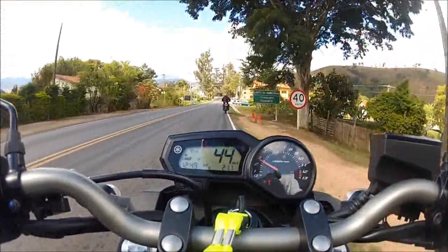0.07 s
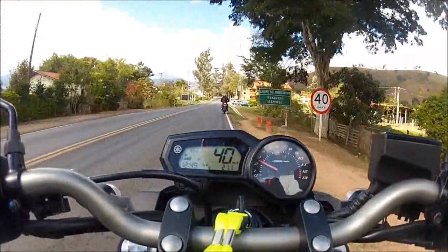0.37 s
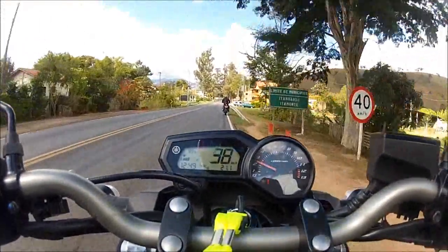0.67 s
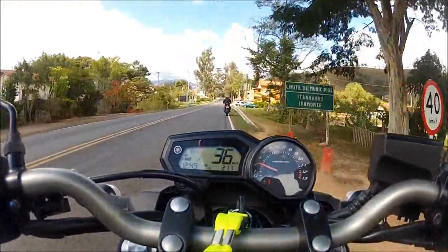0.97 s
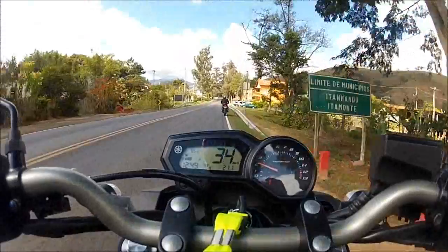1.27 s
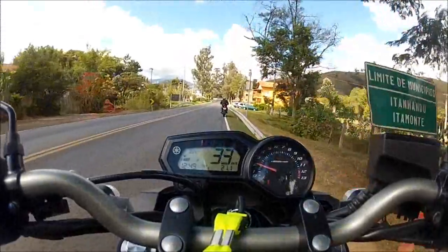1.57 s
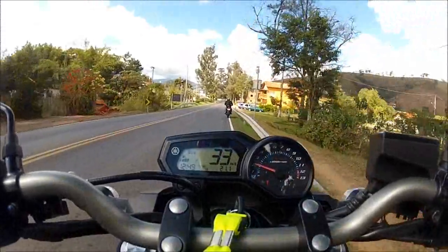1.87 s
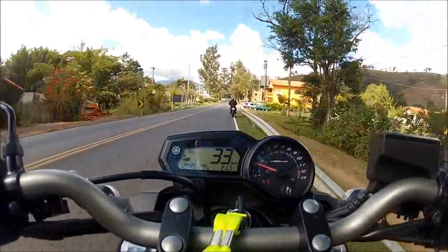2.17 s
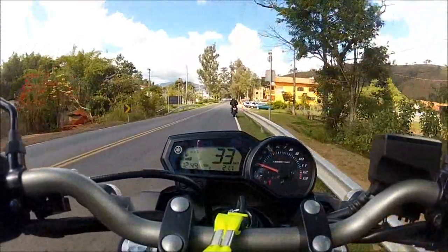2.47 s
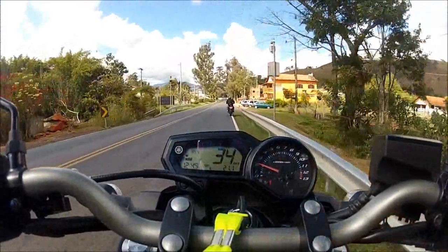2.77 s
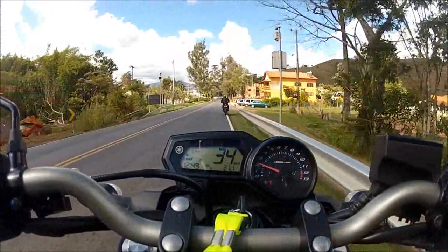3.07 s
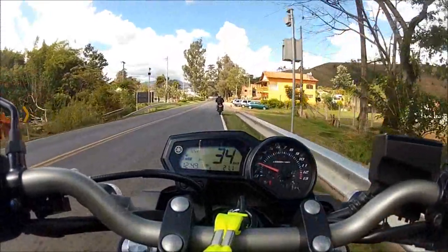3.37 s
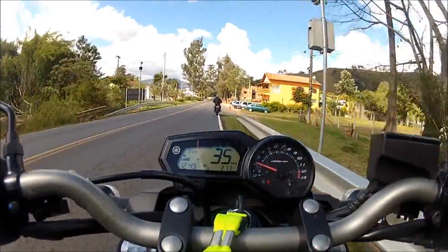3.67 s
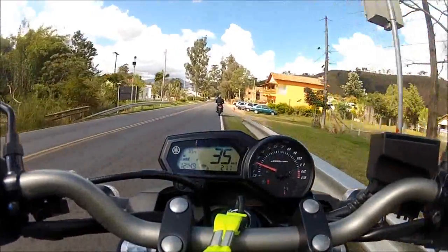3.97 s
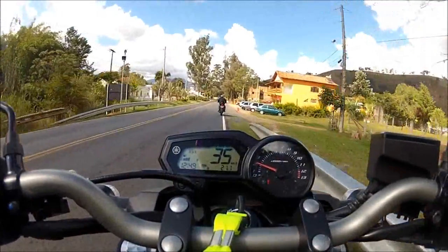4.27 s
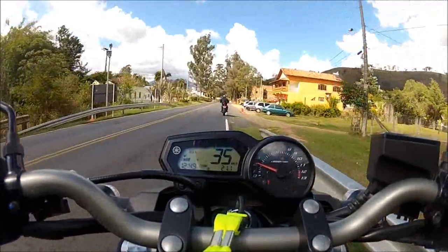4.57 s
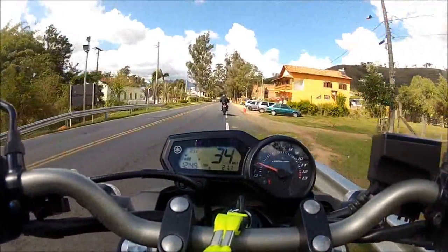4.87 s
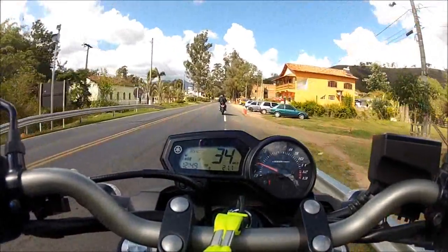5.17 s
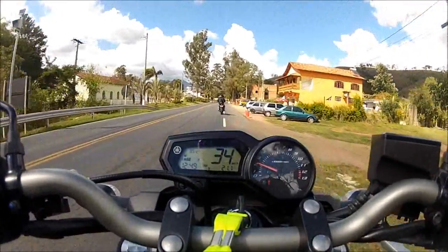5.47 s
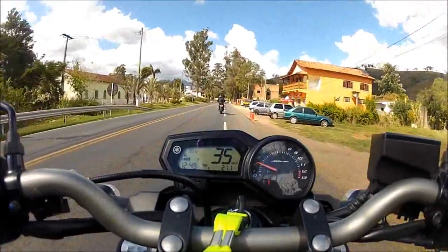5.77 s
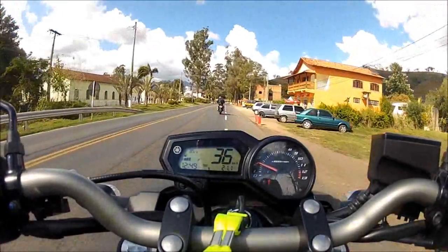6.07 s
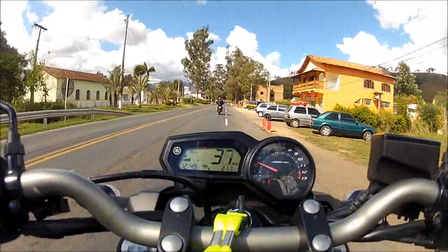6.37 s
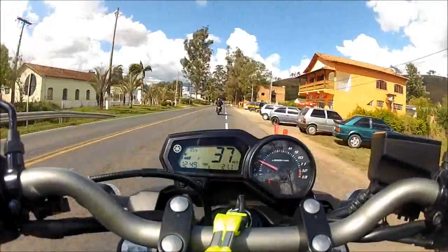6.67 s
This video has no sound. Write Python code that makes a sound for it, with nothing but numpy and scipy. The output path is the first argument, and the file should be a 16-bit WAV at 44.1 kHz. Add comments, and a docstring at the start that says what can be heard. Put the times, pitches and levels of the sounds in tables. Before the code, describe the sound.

A motorcycle coasts with a burbling exhaust, then picks up the throttle and cruises, with wind buffeting the microphone.

```python
"""Motorcycle from the handlebars

One microphone on the bars, in the open air, an arm's length above a four-cylinder engine. The bike coasts
with a burbling exhaust, takes up the throttle with a small jerk, cruises and gently gathers speed.
Gears whine, the valve train rustles, wind buffets the microphone and road bumps thud through the frame."""
import sys
import numpy as np
from scipy.fft import rfft, irfft, next_fast_len
from scipy.io import wavfile
from scipy.ndimage import uniform_filter1d, map_coordinates

SR = 44100
rng = np.random.default_rng(int(sys.argv[2]) if len(sys.argv) > 2 else 0)


def transcribe(signal):
    """Save signal, clipped to [-1, 1], as a 16-bit WAV file at the path in sys.argv[1]."""
    frames = np.atleast_2d(signal).T
    limited = np.clip(frames, -1, 1)
    pcm = np.round(limited * 32767).astype(np.int16)
    wavfile.write(sys.argv[1], SR, pcm)


N = 295911


# tones of the exhaust pipe, behind the rider: crank_multiple, relative_level_db
PIPE_ORDERS = [(2.5, 1), (3, 4.5), (3.5, -15.5), (4, 1), (4.5, -14.5), (5, 1.3), (5.5, -22), (6, -1.8),
               (6.5, -12), (7, -10.5), (7.5, -9.5), (8, -29), (8.5, -19.5), (9, -22), (10, -21), (12, -37),
               (13, -26)]
# silencer resonances, which set the tones' phases: pitch_hz, width_hz, weight_db
SILENCER_MODES = [(125, 70, 0), (400, 190, -8)]
# airbox resonance: pitch_hz, width_hz, gain_db
AIRBOX_MODES = [(469, 12.3, 3.5)]

def exhaust(drive, turns, regular, flutter_db=1.24, roughness=0.083, bark_db=11.5, bark_hz=368):
    """One sharp pulse a turn and the twice-a-turn firing, as crank orders that ring in the silencer."""
    hop = 100  # samples per update of a tone's gain and phase
    speed, throttle = (control[::hop] for control in drive)

    def tone(order, db):
        half_orders = round(2 * order)  # the pitch snaps to the nearest half order
        lag = np.angle(resonances(SILENCER_MODES, order * speed))
        # half orders lie in quadrature: alternate pulses come slightly early and late
        lag = lag + np.pi / 2 * (half_orders % 2)
        gain, lag = np.repeat([amp(db), lag], hop, axis=1)[:, :N]
        return -np.sqrt(2) * gain * np.cos(np.pi * half_orders * turns + lag)

    def flutter(rate):
        return wobble(rate)[::hop]

    def bark(order, width_hz=75):
        # throttle brings out the orders near the silencer's upper resonance
        return bark_db * (throttle - .5) * np.exp(-((order * speed - bark_hz) / width_hz) ** 2)
    pulse = level(drive, db=-31, throttle_db=7, octave_db=3) * tone(0.75, 0.82 * flutter(16))
    drone = level(drive, db=-24.5, throttle_db=3, octave_db=12) * regular * tone(1.91, 0.41 * flutter(14))
    pipe = sum(tone(order, db + bark(order) + flutter_db * flutter(7)) for order, db in PIPE_ORDERS)
    # the open throttle lets the airbox ring along
    airbox = filtered(pipe, lambda hz: resonances(AIRBOX_MODES, hz))
    airbox *= level(drive, db=-6.5, throttle_db=11.5, octave_db=9)
    firing_strength = regular * (1 + roughness * wobble(130))
    overtones = level(drive, db=-39.5, throttle_db=2, octave_db=5) * firing_strength * (pipe + airbox)
    # under load the gas rasps through the silencer in puffs
    puffs = amp(3.2 * np.cos(2 * np.pi * turns)) * ringing([(470, 120, 0)])
    rasp = level(drive, db=-55, throttle_db=13, octave_db=28) * puffs
    return pulse + drone + overtones + rasp


# spectrum of the pops in the pipe, as heard at the bars: frequency_hz, level_db
BURBLE_SPECTRUM = [(30, -39), (60, -3), (100, -2.5), (160, 3), (215, -7), (260, -7.5), (380, -15),
                   (470, -11), (560, -25), (900, -29), (2000, -68.5)]

def burble(drive, turns, scatter_db=6, jitter_s=0.00328):
    """Weak, late and uneven firings pop in the pipe, fading as the throttle opens."""
    speed, throttle = drive
    firings = np.flatnonzero(np.diff(np.floor(2 * turns)))
    late, size = rng.uniform(-0.98, 1, (len(firings), 2)).T
    onsets = np.clip(firings + late * jitter_s * SR, 0, N - 1).astype(int)
    pops = coloured(np.bincount(onsets, -amp(scatter_db * size), N), BURBLE_SPECTRUM)
    opened = np.minimum(throttle / .58, 1) ** 2
    return level((speed, opened), db=-28, throttle_db=-11.5, octave_db=5.5) * pops


# crankcase resonances, below the microphone: pitch_hz, width_hz, level_db
CRANKCASE_MODES = [(625, 60, 4.5), (873, 98, -1), (980, 41, -0.5), (1203, 130, -1), (1556, 400, -6.5),
                   (1920, 320, -7.5)]

def crankcase(drive):
    """Combustion shakes the crankcase."""
    return level(drive, db=-41.6, throttle_db=2, octave_db=12) * ringing(CRANKCASE_MODES)


# spectrum of the intake air: frequency_hz, level_db
INTAKE_SPECTRUM = [(60, -23.5), (170, 3.5), (260, 2), (450, 3.5), (560, -2.5), (750, -9.5), (1100, -23),
                   (2000, -11.5), (2600, -19.5), (5000, -31.5), (15000, -47)]

def intake(drive, turns):
    """The intake draws a puff of air once a turn."""
    puffs = amp(2 * np.cos(2 * np.pi * (turns - .16))) * coloured(noise(), INTAKE_SPECTRUM)
    return level(drive, db=-40, throttle_db=1.9, octave_db=10) * puffs


# spectrum of the valve train, an arm's length away: frequency_hz, level_db
VALVE_SPECTRUM = [(900, -22), (2200, 4.5), (2700, 0.5), (4600, -2), (5800, -8), (7000, -11.5), (9300, -11),
                  (10500, -12), (15000, -13.5)]
# engine cover resonances: pitch_hz, width_hz, level_db
COVER_MODES = [(2993, 116, 4.5), (3457, 105, 3.5), (4040, 290, 0.5), (5440, 1000, -4.5)]

def valve_train(drive):
    """The valve train rustles and rings in the covers."""
    rustle = coloured(noise(), VALVE_SPECTRUM) + amp(-0.5) * ringing(COVER_MODES)
    flicker = amp(1.06 * wobble(260) + 0.3 * wobble(15))
    return level(drive, db=-54.5, throttle_db=3, octave_db=13.5) * flicker * rustle


def throttle_sizzle(drive):
    """Air sizzles past the throttle plate as it opens."""
    sizzle = amp(1.6 * wobble(18)) * ringing([(9100, 930, 2), (12500, 4900, -7)])
    return level(drive, db=-76.5, throttle_db=13.5, octave_db=20) * sizzle


# the drive shunts, so the teeth bounce clear (-) or bite (+): centre_s, half_length_s, whine_change_db
GEAR_LASH = [(1.11, 0.014, -12), (1.37, .02, -13), (1.485, .02, -20), (1.55, .025, 4), (1.7, 0.098, -24),
             (1.865, .025, 5), (1.92, .018, -23), (1.97, .02, 5.5), (2.02, 0.013, -12), (4.3, 0.022, 16)]
# gear housing resonance: pitch_hz, width_hz, gain_db
HOUSING_MODES = [(1195, 126, 0)]
# clutch cover resonance: pitch_hz, width_hz, gain_db
CLUTCH_MODES = [(1198, 43, 0)]
# gearbox resonances, down by the rider's feet: pitch_hz, width_hz, level_db
GEARBOX_MODES = [(819, 26, -2.5), (898, 33, 0), (974, 33, -4)]

def gears(drive, grip_hz_per_s=1.83, slack_rad=0.53, runout_db=7):
    """Teeth whine while the bike slows or gathers speed, and rattle loosely while its speed is steady."""
    speed, throttle = drive
    turns = np.cumsum(speed) / SR
    acceleration = uniform_filter1d(np.gradient(speed) * SR, size=SR // 4)
    loose = 1 / (1 + (acceleration / grip_hz_per_s) ** 4)
    contact = amp(-15 * loose + swells(GEAR_LASH))
    beat = np.cos(2 * np.pi * turns)
    torque = 1 + .65 * beat  # the teeth are loaded and released once a turn

    def mesh(order):
        phase = 2 * np.pi * order * turns + slack_rad * wobble(45) + 0.85 * wobble(8)
        return unit(np.sin(phase) * amp(2.2 * wobble(25)) * torque)
    main, side, upper = mesh(18.45), mesh(17.5), mesh(22)
    housed = filtered(main + amp(-6.5 - 9 * throttle) * side, lambda hz: resonances(HOUSING_MODES, hz))
    # a slightly eccentric gear bites harder once in four crank turns
    bite = amp(runout_db * throttle * np.cos(2 * np.pi * turns / 4))
    whine = level(drive, db=-43.5, throttle_db=-0.5, octave_db=10) * housed
    whine += level(drive, db=-53, throttle_db=8, octave_db=3) * unit(bite * upper)
    whine = filtered(contact * whine, lambda hz: 1 + resonances(CLUTCH_MODES, hz))
    rattle = amp(-50 + 6 * loose + 0.76 * beat) * ringing(GEARBOX_MODES)
    return whine + rattle + coasting_buzz(drive, torque)


def coasting_buzz(drive, torque, full_above_hz=74.5, fall_db_per_hz=3):
    """On a closed throttle a thin metallic buzz and the airbox's hollow hum fade as the engine slows."""
    speed, throttle = drive
    metal = amp(-3.5) * torque * ringing([(4160, 270, 0)])
    hum = amp(5) * ringing(AIRBOX_MODES) + amp(1) * ringing([(660, 70, 0)])
    fade_db = fall_db_per_hz * np.maximum(full_above_hz - speed, 0)
    return amp(-46 - fade_db - 18 * throttle) * (metal + hum)


# spectrum of the wind right on the microphone: frequency_hz, level_db
BUFFET_SPECTRUM = [(10, -15), (25, 3.5), (48, 1.5), (90, -1), (150, -4.5), (300, -18), (700, -27.5),
                   (2000, -70)]
# the strongest gusts: centre_s, half_length_s, boost_db
GUSTS = [(.13, .1, 6), (.43, 0.11, 9), (1.17, .1, 8.5), (2.13, 0.059, 9), (2.33, .045, 8), (2.97, .08, 4.5),
         (3.34, .09, 7), (3.63, .1, 6), (4.08, .045, 11), (5.69, .07, 7), (6.05, .08, 10)]

def wind(steady_db=-38.4, drift_db=1, lump_db=2.8):
    """Turbulent air bumps against the microphone."""
    buffet_db = steady_db + drift_db * wobble(4.3) + swells(GUSTS)
    return amp(buffet_db) * unit(amp(lump_db * wobble(12)) * coloured(noise(), BUFFET_SPECTRUM))


# bumps in the road under the wheels: start_s, relative_level_db
ROAD_BUMPS = [(0.065, -10.5), (0.138, -8), (0.441, -12), (0.886, -9), (1.553, -11), (1.634, -11),
              (4.075, -12)]

def road_bumps(t60_s=0.02):
    """Bumps thud up through the frame to the bars as three damped low tones."""
    out = np.zeros(N)
    for start_s, bump_db in ROAD_BUMPS:
        age = np.maximum(np.arange(N) / SR - start_s, 0)
        for hz, mode_db in [(100, -23), (150, -0.5), (240, -18)]:
            out -= amp(bump_db + mode_db - 60 * age / t60_s) * np.sin(2 * np.pi * hz * age)
    return out


# two faint ticks: start_s, level_db, pitch_hz, t60_s
TICKS = [(0.476, -43, 13800, .03), (1.848, -43, 4450, .06)]

def ticks(width_hz=1400):
    """A faint, very high, brief tick, then a lower one as the drive takes up its slack."""
    out = np.zeros(N)
    for start_s, db, hz, t60_s in TICKS:
        age = np.arange(N) / SR - start_s
        out += amp(db - 60 * np.abs(age) / t60_s) * (age > 0) * ringing([(hz, width_hz, 0)])
    return out


def level(drive, db, throttle_db, octave_db, cruise_hz=67):
    """Gain of a part: db when coasting at cruise_hz, changed by throttle and per doubling of speed."""
    speed, throttle = drive
    return amp(db + throttle_db * throttle + octave_db * np.log2(speed / cruise_hz))


def amp(db):
    """Decibels to gain."""
    return 10 ** (np.asarray(db) / 20)


def unit(x):
    """Scale to rms 1."""
    return x / np.sqrt(np.mean(x ** 2) + 1e-20)


def noise():
    """White noise of rms 1."""
    return rng.standard_normal(N)


def curve(rows):
    """Straight lines through (time_s, value) rows, one value per sample."""
    return np.interp(np.arange(N) / SR, *np.transpose(rows))


def swells(rows):
    """A bell-shaped swell for each (centre_s, half_length_s, size) row."""
    t = np.arange(N) / SR
    return sum(size * np.exp(-((t - centre) / half) ** 2) for centre, half, size in rows)


def wobble(rate):
    """A smooth random curve, rate knots a second."""
    at = np.arange(0, N + 32, 32)
    knots = rng.standard_normal(int(N * rate / SR) + 4)
    return np.interp(np.arange(N), at, map_coordinates(knots, [at * rate / SR]))


def filtered(x, response):
    """x through a response given as a function of frequency."""
    size = next_fast_len(N + SR // 2)
    return irfft(rfft(x, size) * response(np.fft.rfftfreq(size, 1 / SR)), size)[:N]


def coloured(x, points):
    """x through a causal filter given as (frequency_hz, level_db) points, at rms 1."""
    def response(hz):
        points_hz, db = np.transpose(points)
        gain = amp(np.interp(np.log(hz + 1), np.log(points_hz), db))
        cepstrum = irfft(np.log(gain))
        # folding onto positive time gives minimum phase
        cepstrum[1:len(cepstrum) // 2] *= 2
        cepstrum[len(cepstrum) // 2 + 1:] = 0
        return np.exp(rfft(cepstrum))
    return unit(filtered(x, response))


def resonances(modes, hz):
    """Complex response of (pitch_hz, width_hz, gain_db) modes."""
    return sum(amp(db) * 1j * hz * width / (pitch ** 2 - hz ** 2 + 1j * hz * width)
               for pitch, width, db in modes)


def ringing(modes):
    """Modes shaken by noise, as by dense random impacts, at rms 1; the skirts fall steeply."""
    def power(hz, pitch, width):
        return (hz * width) ** 2 / ((pitch ** 2 - hz ** 2) ** 2 + (hz * width) ** 2)

    def gain(hz):
        return np.sqrt(sum(amp(db) ** 2 * power(hz, pitch, width) * power(hz, pitch, 5 * width)
                           for pitch, width, db in modes))
    return unit(filtered(noise(), gain))


# crankshaft speed, as the moving bike holds it: time_s, speed_hz
CRANK_SPEED = [(0, 79.3), (.43, 72.4), (.8, 67.6), (1.25, 65), (1.68, 63.2), (2.05, 64.2), (2.95, 67.05),
               (3.3, 67.6), (3.85, 68), (4.6, 67), (5.28, 67.5), (5.8, 69.7), (6.1, 71.5), (6.71, 76.3)]
# the rider's hand beside the microphone: time_s, throttle_fraction (0 closed, 1 pulling away)
THROTTLE = [(0, 0), (1.57, 0.0061), (1.68, 0.45), (1.84, .75), (1.97, 0.55), (2.5, .75), (3.4, .8),
            (3.85, 0.45), (4.28, 0.6), (4.5, 0.43), (5.15, 0.62), (5.7, 0.75), (6.71, 0.96)]
# the crank jerks within the slack of the drive: centre_s, half_length_s, extra_speed_hz
CRANK_JERKS = [(1.83, 0.066, 4.5), (4.12, .07, -1.17), (4.25, 0.0625, 1.8)]
# the exhaust surges while coasting: centre_s, half_length_s, boost_db
EXHAUST_SURGES = [(.16, .08, 4), (.45, 0.085, 7), (1.18, .06, 1)]

def scene(coast_firing=0.33, clean_throttle=0.51):
    """Speed and throttle drive every part of the engine; the crankshaft runs less evenly when coasting."""
    speed, throttle = curve(CRANK_SPEED), curve(THROTTLE)
    regular = np.interp(throttle, [0, clean_throttle], [coast_firing, 1])  # share of regular firing
    crank = speed + swells(CRANK_JERKS)
    drive = crank, throttle
    turns = np.cumsum(crank * (1 + 0.0018 * wobble(20))) / SR
    hunting = 0.027 * (1 - regular) * wobble(24.8)
    tailpipe = amp(swells(EXHAUST_SURGES)) * exhaust(drive, turns + hunting, regular) + burble(drive, turns)
    engine = crankcase(drive) + intake(drive, turns) + valve_train(drive) + throttle_sizzle(drive)
    gearbox = gears((speed, throttle))  # the clutch springs keep the crank's jerks from the gears
    return (tailpipe + engine + gearbox + wind() + road_bumps() + ticks())[None]


def record(dry, top_hz=15330):
    """The mono camera microphone on the handlebars keeps nothing above its band limit."""
    return filtered(dry[0], lambda hz: hz < top_hz)[None]


dry = scene()
out = record(dry)
transcribe(out)
```